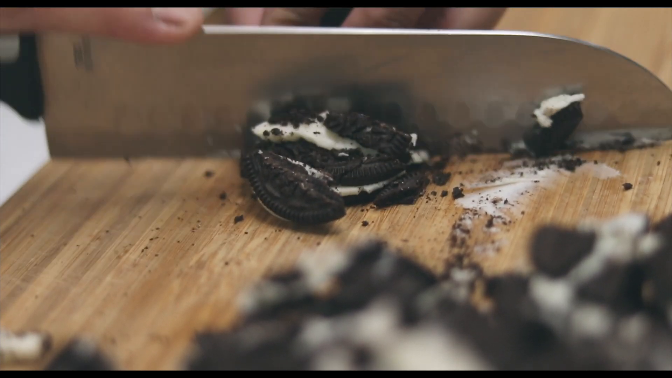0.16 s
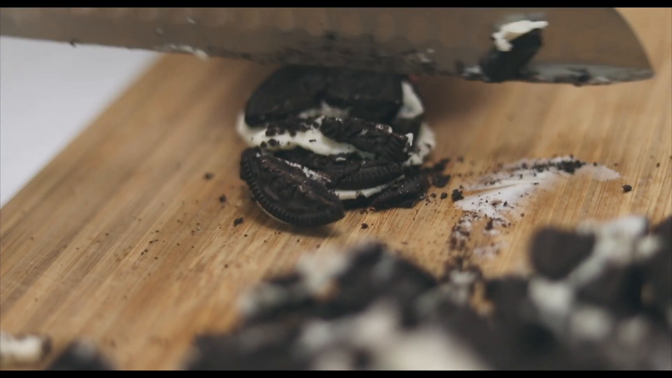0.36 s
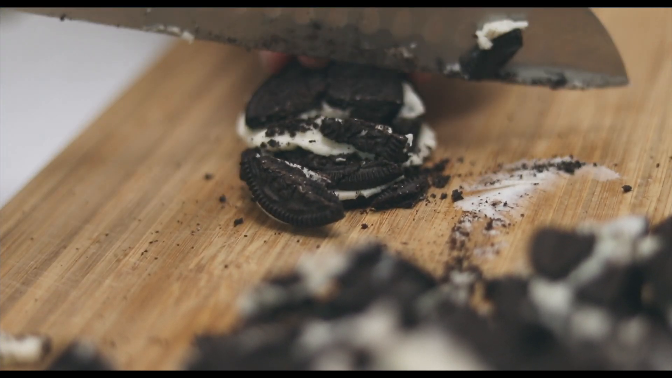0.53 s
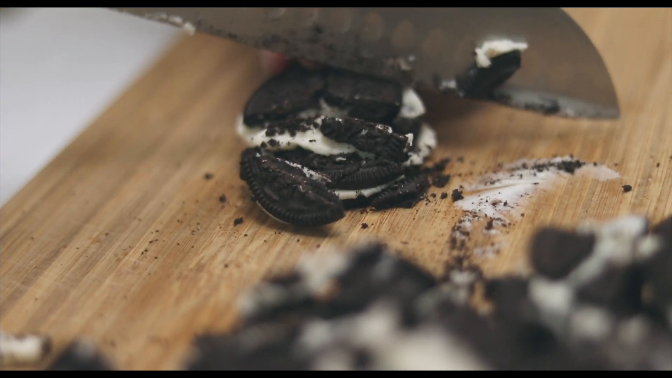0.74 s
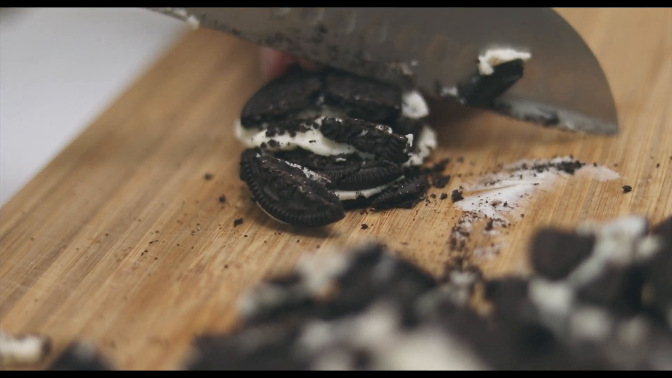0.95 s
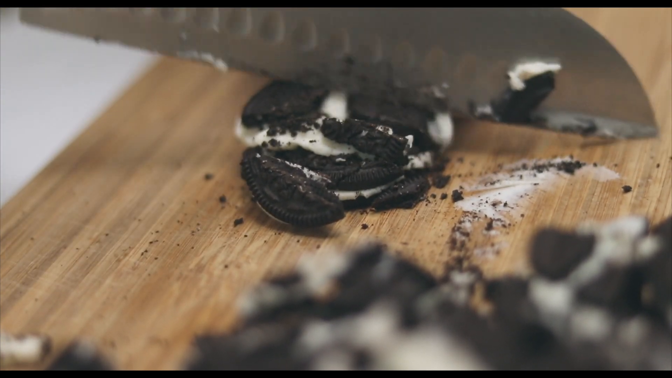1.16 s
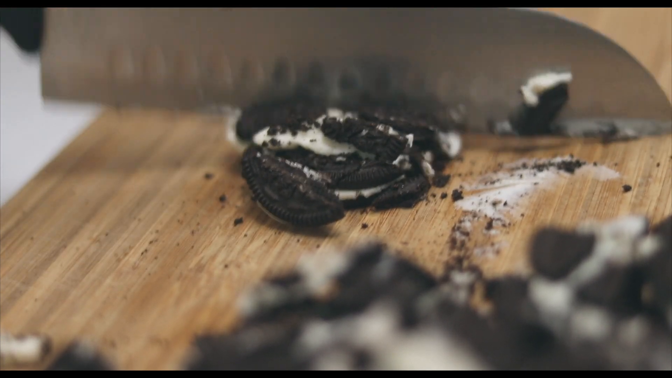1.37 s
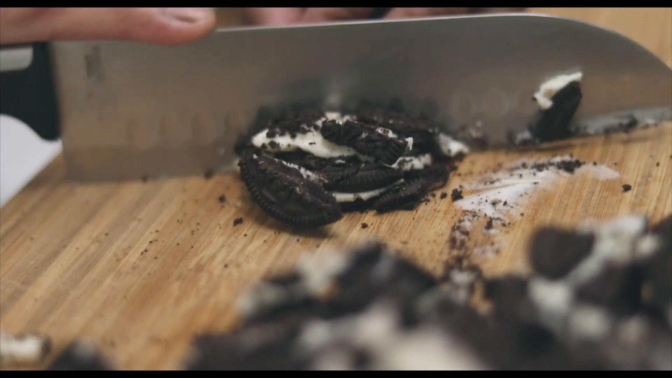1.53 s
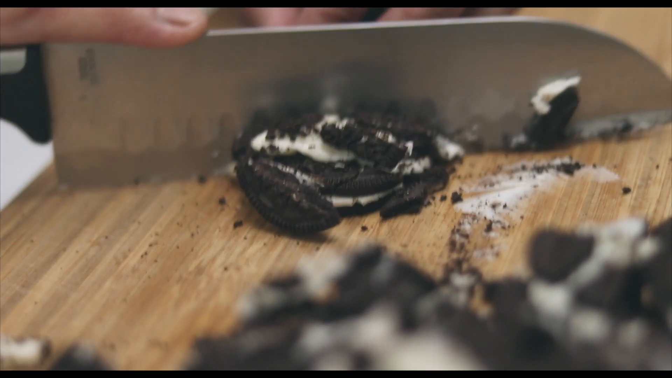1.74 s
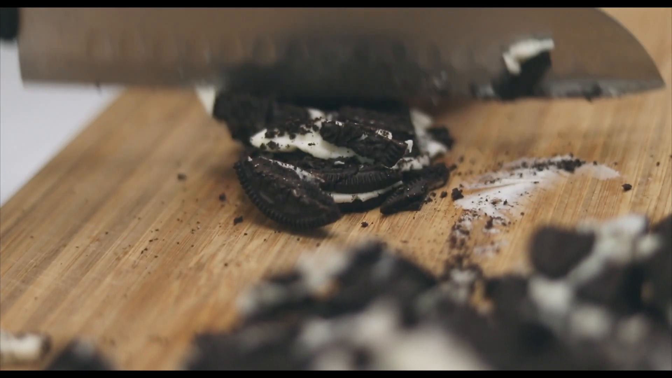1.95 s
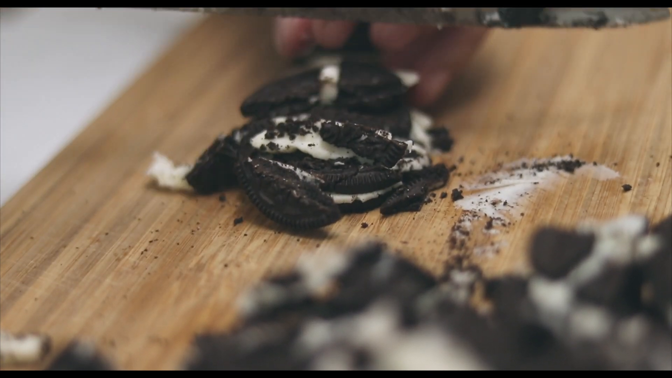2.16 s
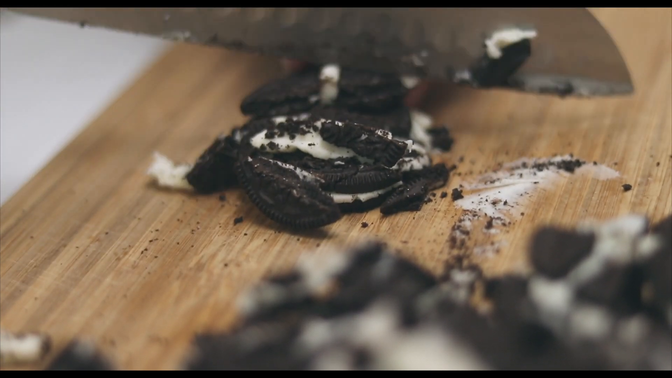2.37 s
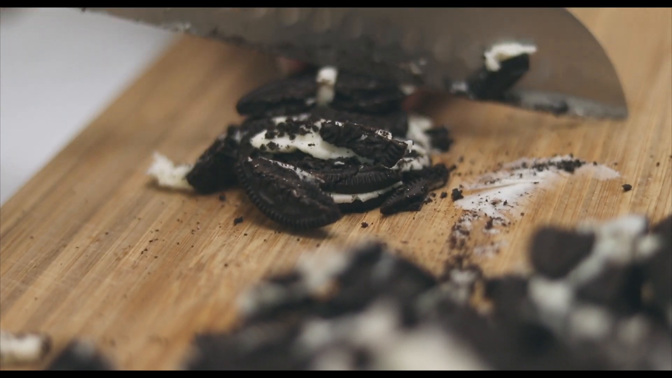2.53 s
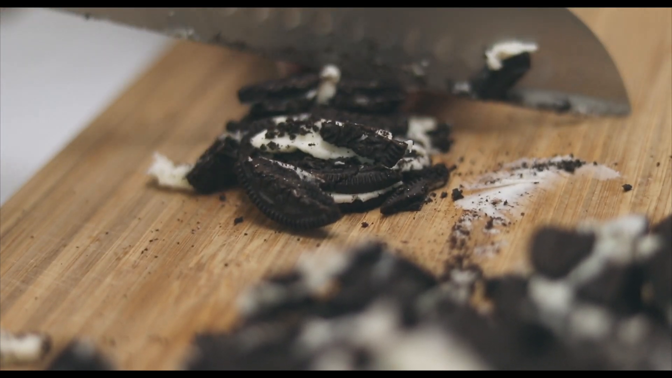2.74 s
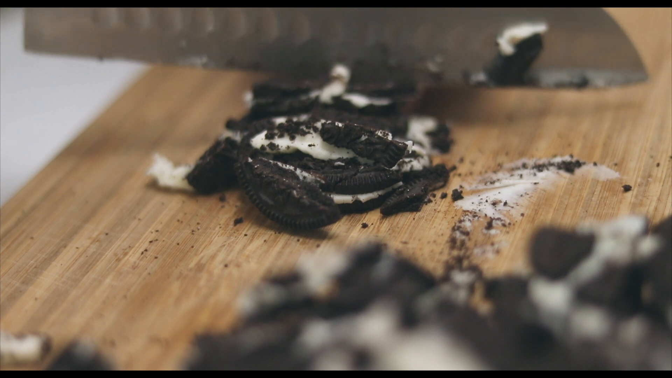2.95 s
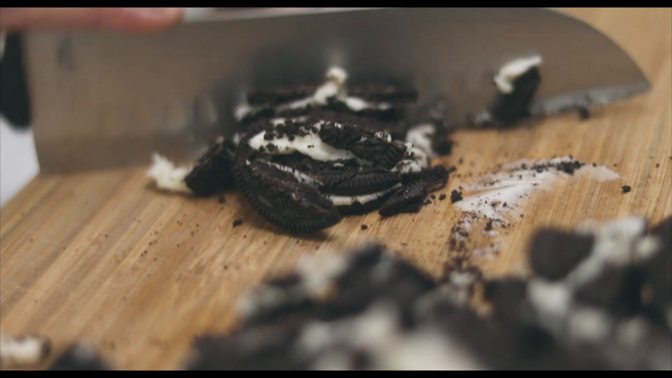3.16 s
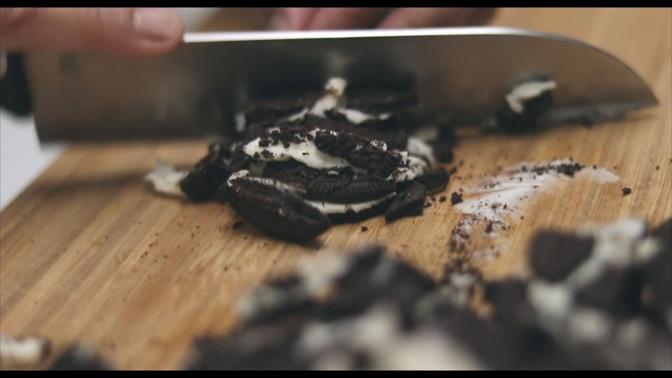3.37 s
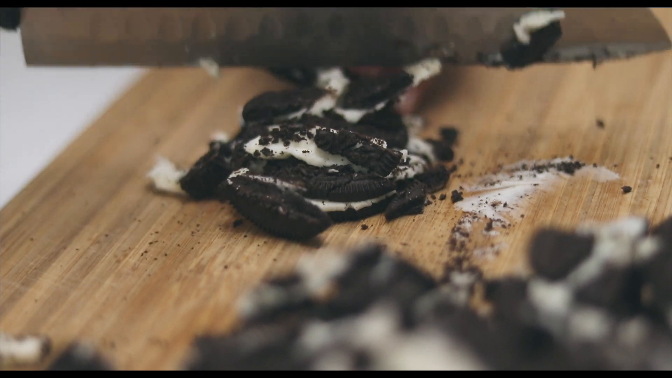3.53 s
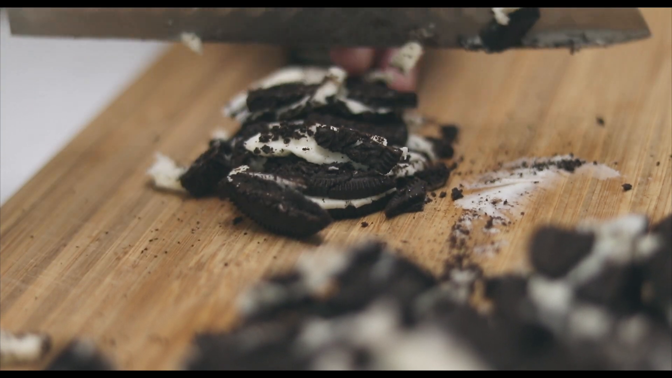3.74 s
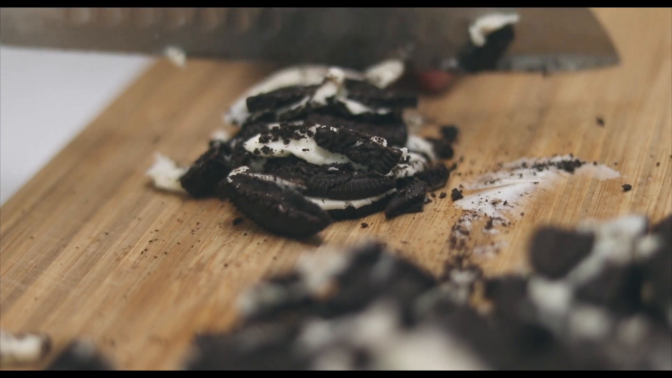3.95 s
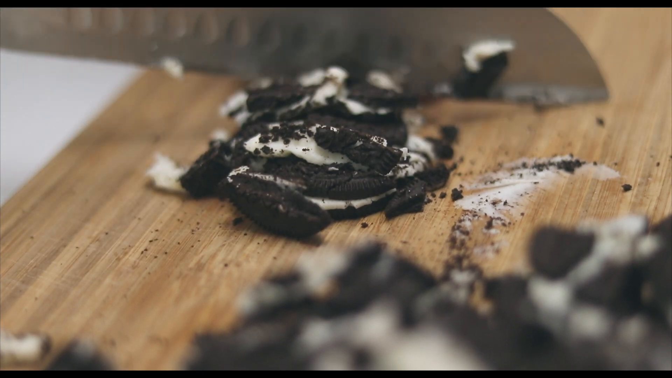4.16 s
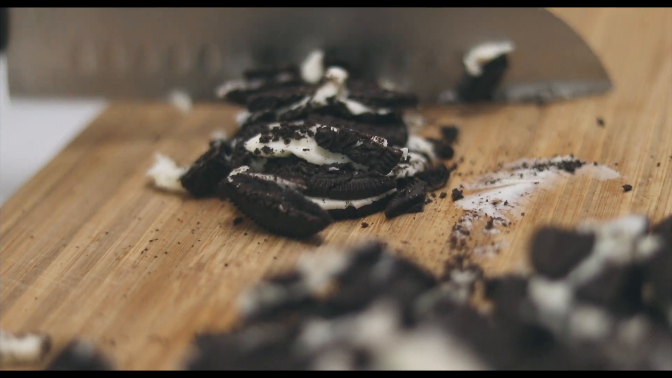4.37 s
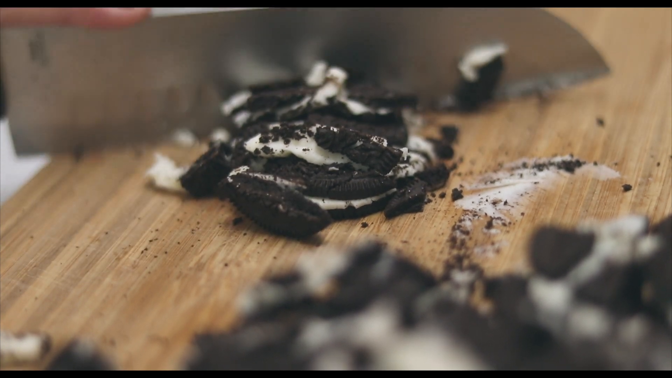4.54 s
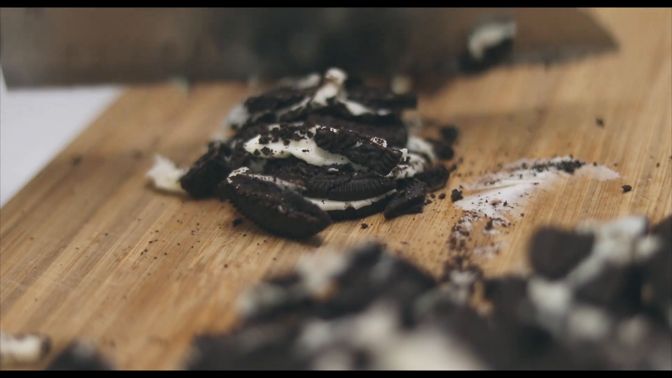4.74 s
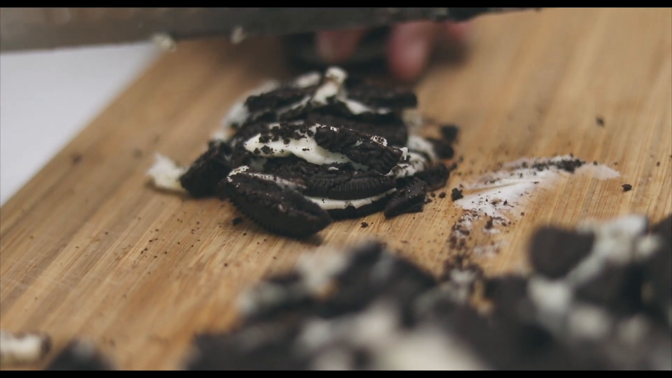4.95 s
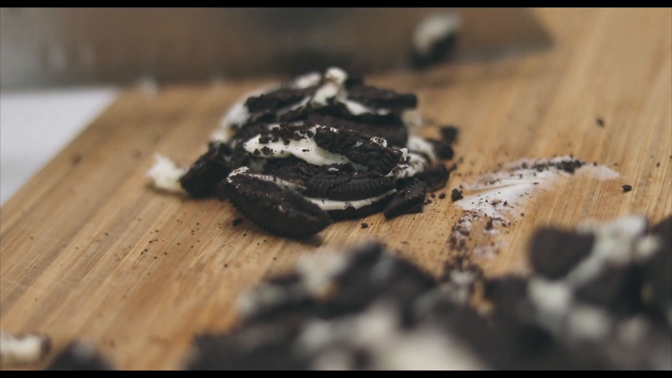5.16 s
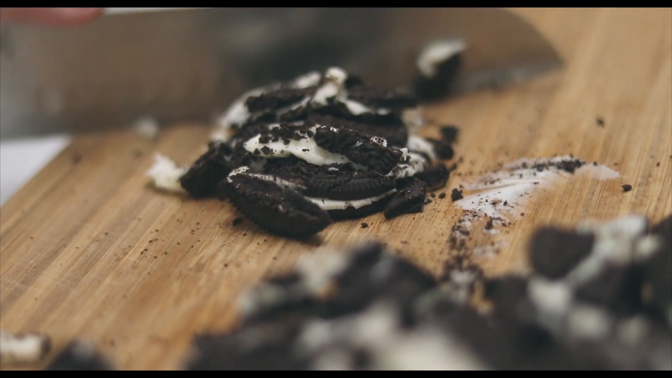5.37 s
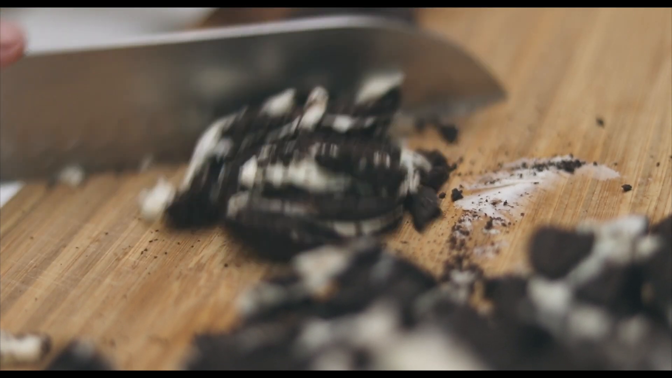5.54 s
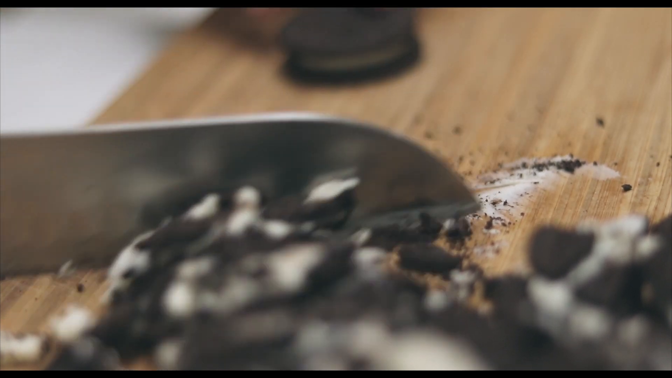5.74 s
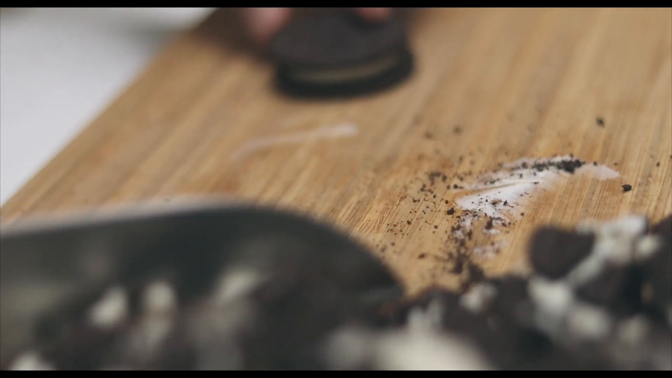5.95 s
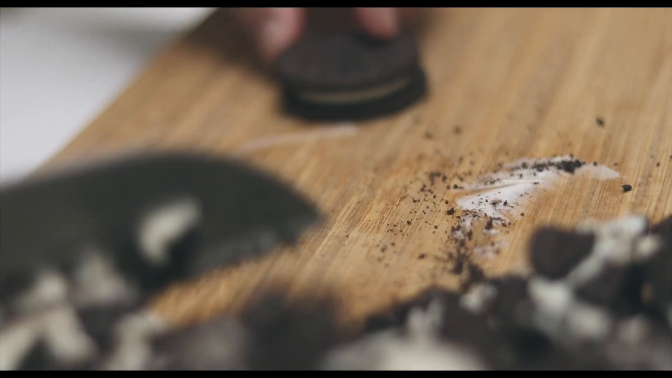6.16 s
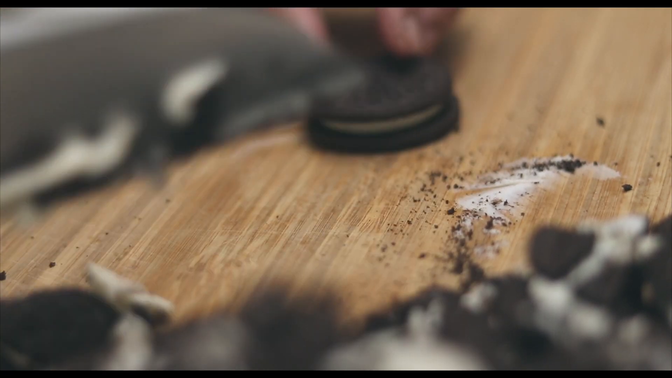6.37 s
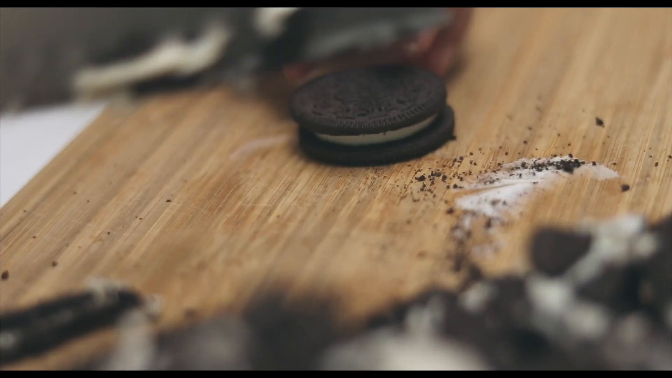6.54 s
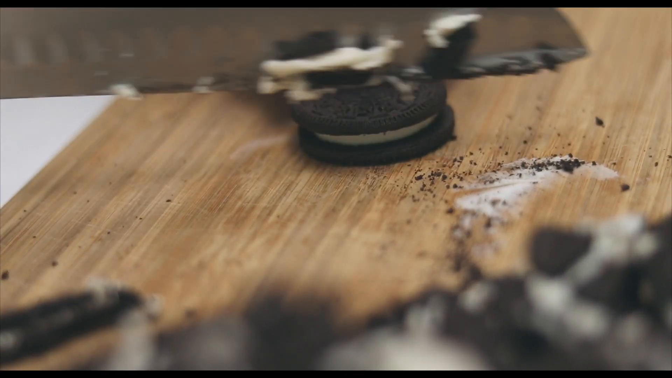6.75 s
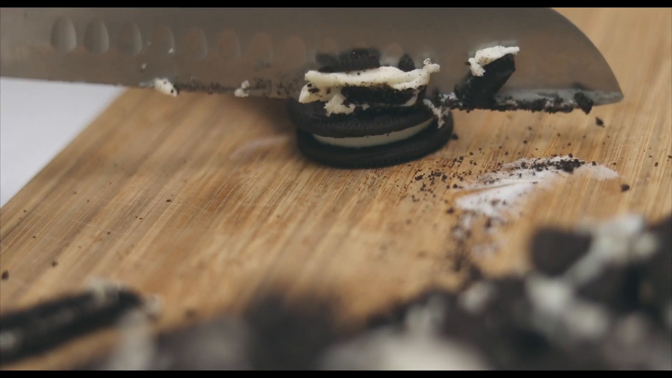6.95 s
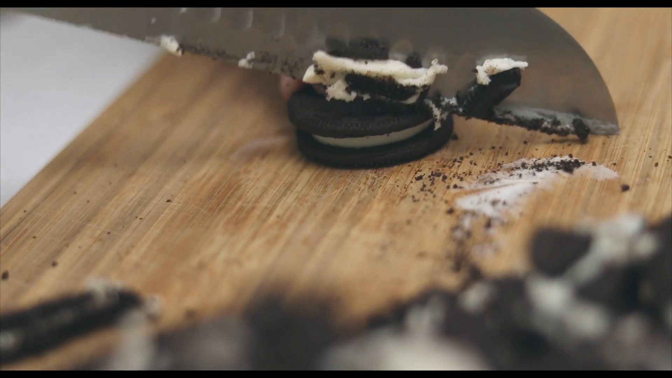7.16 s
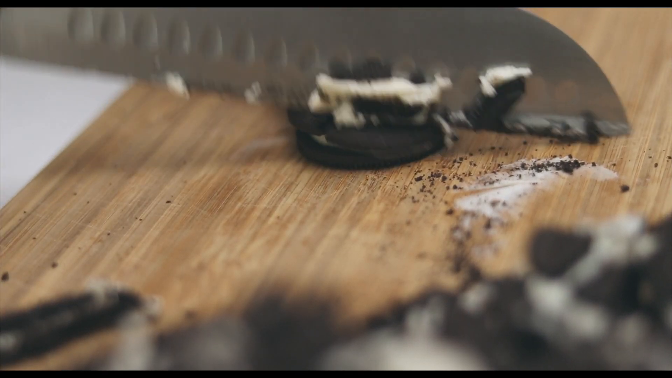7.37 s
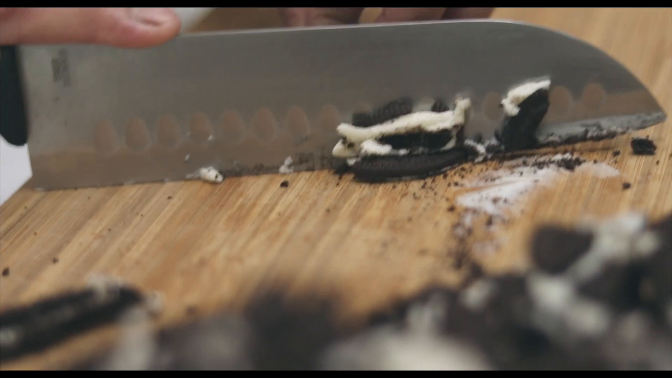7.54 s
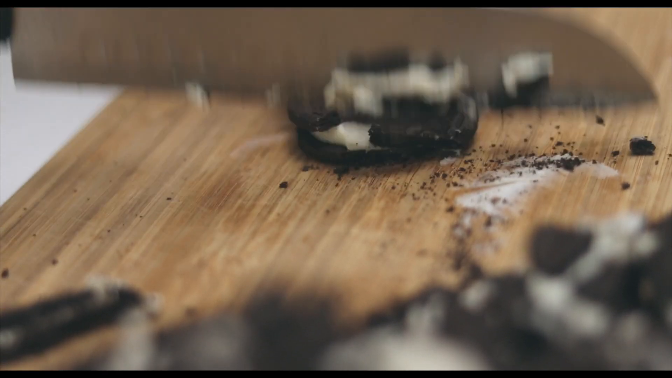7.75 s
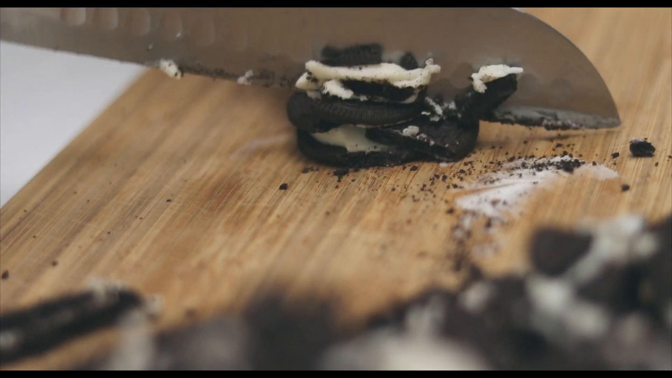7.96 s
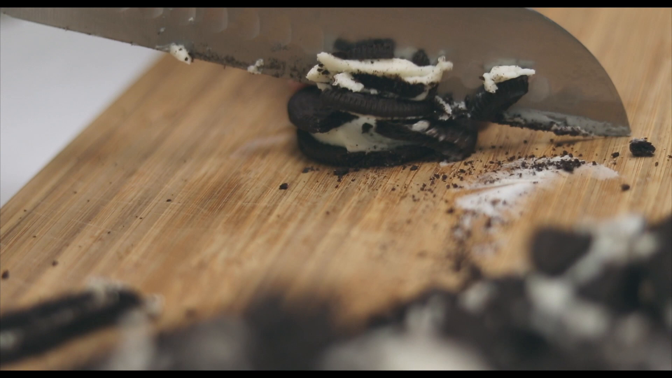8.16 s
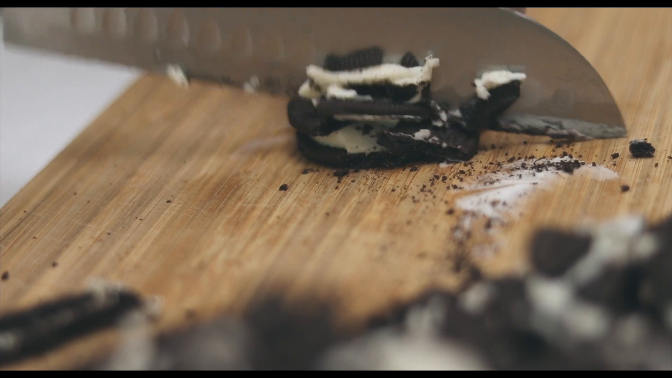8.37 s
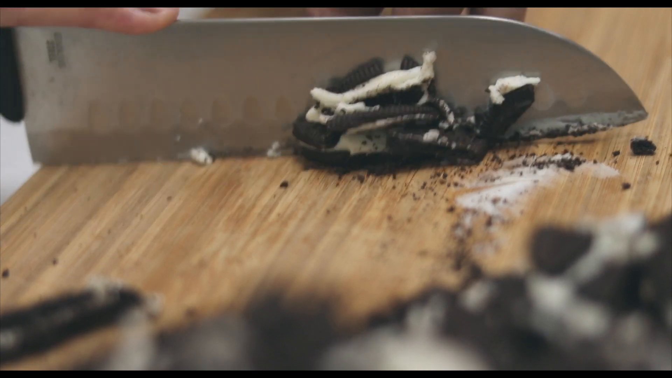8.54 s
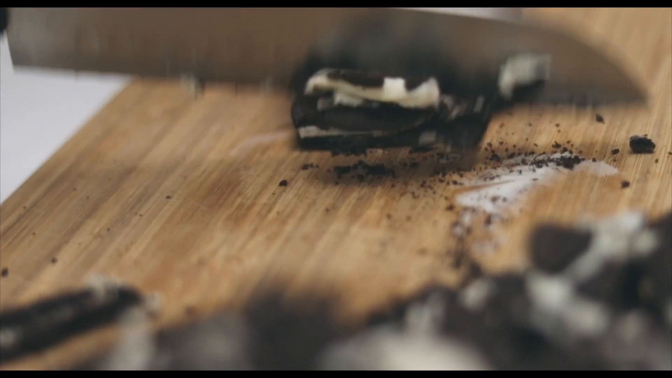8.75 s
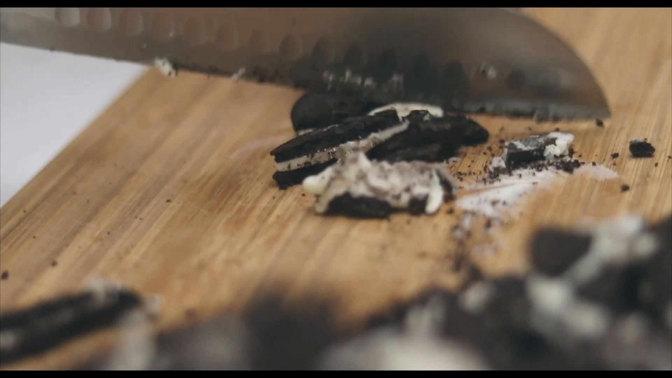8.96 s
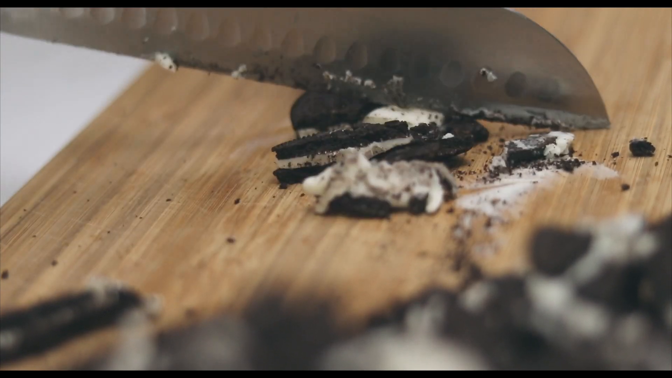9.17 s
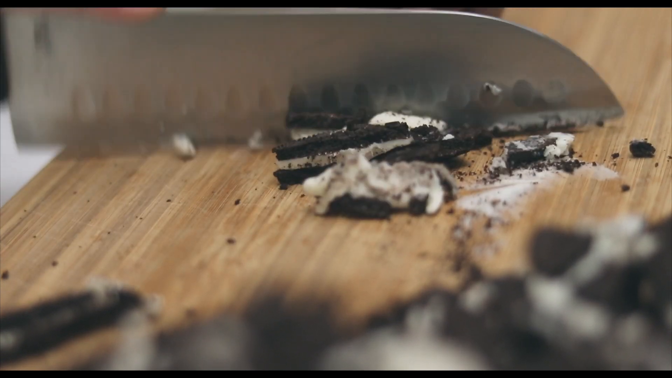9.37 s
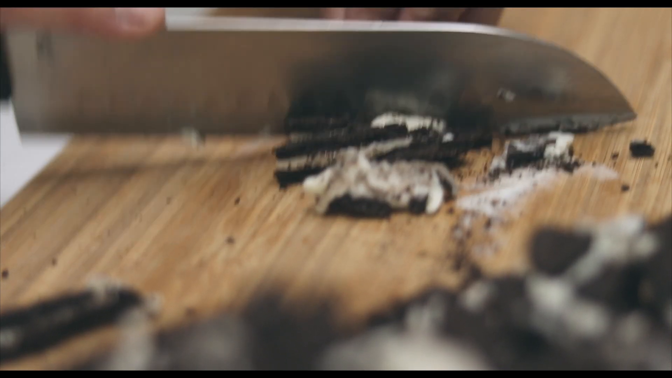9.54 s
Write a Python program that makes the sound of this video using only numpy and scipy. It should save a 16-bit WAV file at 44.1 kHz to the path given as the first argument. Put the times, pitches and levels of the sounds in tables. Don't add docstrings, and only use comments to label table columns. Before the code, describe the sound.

In a hard-walled kitchen with a very faint fridge hum, a close microphone catches a knife cutting crisp cookies on a wooden board. It opens mid-crunch with brittle cracks, then light taps and ticks. From about 1.2 s crackling thickens into a loud woody chop at 1.5 s. Quiet crumbs and dull knocks follow, then the hardest crunching chop at 3.1 s. A clean knock at 4.2 s precedes a quick double chop around 4.5 s. The edge lands at 5.3 s and drags until about 6.6 s, hissing, rasping and faintly singing, fading as pieces topple with tiny ticks. Near 7.5 s comes a crunchy thudding cut, a softer knock at 8.2 s, and a sharp crackling chop at 8.5 s. Pieces settle around 9 s, then a final, smaller crunch at 9.4 s. Blows ring briefly, echo off a wall, and the loudest overload slightly.

```python
import sys
import numpy as np
from scipy import signal
from scipy.fft import rfft, irfft, next_fast_len
from scipy.io import wavfile
from scipy.ndimage import uniform_filter1d

SR = 44100
rng = np.random.default_rng(int(sys.argv[2]) if len(sys.argv) > 2 else 0)


def generate_wav(signal):
    frames = np.transpose(np.atleast_2d(signal))
    scaled = np.clip(frames, -1, 1) * 32767
    pcm = np.round(scaled).astype(np.int16)
    wavfile.write(sys.argv[1], SR, pcm)


def volts(x):
    e = np.asarray(x, float) / 20
    return 10 ** e


N = 423801

# (pitch [Hz], width [Hz], level [dB])
FRIDGE_HUM = [(117, 27, -65.5), (325, 320, -69.5), (470, 18, -79)]
# (pitch [Hz], level [dB per Hz])
AIR_COLOUR = [(12, -52.5), (20, -15), (59, -17), (113, -0.5), (249, -7), (326, -12), (715, -15.5),
              (889, -11.5), (1260, -18), (1700, -14.5), (2420, -28), (2770, -18.5), (13000, -36.5)]
AIR_DB = -67.5

# (time [s], hold [s], level [dB])
PUSHES = [(0, 0.12, -41), (0.75, 0.0082, -62.5), (0.95, 0.012, -53.5), (1.293, 0.1, -46),
          (1.507, 0.078, -38.5), (2.008, 0.14, -81), (2.453, 0.056, -65.5), (2.66, 0.053, -57.5),
          (3.154, 0.055, -35), (4.22, 0.0069, -49), (4.477, 0.019, -37.5), (4.611, 0.084, -64),
          (5.297, 0.013, -49), (5.601, 1.26, -75.5), (7.208, 0.22, -56.5), (7.577, 0.073, -43.5),
          (8.529, 0.057, -42), (8.946, 0.26, -68), (9.466, 0.06, -39)]
PUSH_RISE_DB_PER_S, PUSH_FALL_DB_PER_S = 262, 119.5
# (pitch [Hz], level [dB])
RUMBLE_COLOUR = [(10, -36.5), (25, -5.0), (60, -4.0), (95, -4.0), (170, -12.5), (400, -64.0)]

# (pitch [Hz], level [dB], time to die by 60 dB [s])
DEEP_MODES = [(330, -5, .05), (440, -1, .045), (560, -7, .03)]
MAIN_MODES = [(720, -21, .018), (880, -2, .035), (940, -2, .03), (1075, -7, .022), (1170, -1, .01)]
MIDDLE_MODES = [(1430, -8, .022), (1550, -6, .022), (1700, -1, .03), (1880, -8, .014), (2125, -15, .025)]
UPPER_MODES = [(2335, -11, .025), (2715, -1, .03), (3100, -7, .03)]
# (pitch [Hz], level [dB], time to die by 60 dB [s])
CHOP_MAIN = [(883, 0, 0.037), (1000, -3.5, 0.032), (1188, -16.5, 0.044)]
CHOP_MIDDLE = [(1325, -10.5, .03), (1491, -4, 0.062), (1530, -5, .03), (1694, 1.5, 0.032),
               (1814, -11.5, .035)]
CHOP_UPPER = [(2190, -8, .025), (2684, -3, 0.047), (2772, -1.5, 0.06), (3110, -2, 0.025),
              (3490, -7.5, 0.02), (4220, -9.5, .012)]
# (pitch [Hz], level [dB], time to die by 60 dB [s])
LAND_MAIN = [(676, -19, 0.021), (970, -2.5, .028), (1080, -4.5, .02)]
LAND_MIDDLE = [(1360, -10.5, 0.031), (1709, -1.5, 0.035), (2103, -8, .04)]
# (pitch [Hz], width [Hz], level [dB])
SINGING_MODES = [(345.2, 74, -5.5), (445, 35, -10), (920.2, 48, 2.5), (1409, 270, -4), (1669, 65, 0.5),
                 (2702, 140, -4.5), (2786, 70, -7), (3140, 53, -14.5), (3880, 110, -12)]
SING_SHARE = 1.05

# (start [s], length [s], snaps at the end [dB], growth [dB], board ring [dB])
GRINDS = [(0, 0.075, -31, 0, -27.5), (1.031, 0.24, -54.5, 7.5, -52), (1.274, 0.095, -50, -1, -43),
          (1.402, 0.07, -30, 15, -24), (1.489, 0.058, -28.5, 5, -25.5), (2.636, 0.1, -68.5, -3.5, -65.5),
          (2.731, .2, -79, 0, -66), (3.086, 0.03, -41.5, 2, -38), (3.112, 0.014, -25.5, 9, -16),
          (2.289, 0.039, -76.5, 3.5, -64.5), (8.459, 0.036, -47, 6, -39), (1.379, 0.04, -55.5, -4, -56),
          (3.134, 0.12, -36, 3.5, -29), (4.177, 0.022, -54, 3, -44.5), (4.382, 0.078, -49, 15.5, -44),
          (4.48, 0.093, -52, -4.5, -41.5), (7.43, 0.058, -58.5, -11, -56), (7.498, 0.052, -40, 2.5, -38.5),
          (7.57, 0.019, -33.5, 0.5, -29.5), (8.433, 0.055, -38.5, 31, -36),
          (8.528, 0.044, -20.5, 19.5, -53), (8.984, 0.05, -71.5, -13.5, -67.5),
          (7.018, 0.082, -71.5, 1, -79), (3.043, .045, -64.5, 0.5, -59.5), (9.346, 0.077, -48, 2.5, -49),
          (9.393, 0.079, -28, 6, -29.5)]
GRIND_START_S, GRIND_FALL_DB_PER_S = 0.0014, 601
RING_FALL_DB_PER_S, RING_GROWTH = 452, 1
EASE_PER_DB = 0.08
# (start [s], length [s], level [dB])
RUSTLES = [(0, .09, -40.5), (0.229, 0.011, -51.5), (0.251, 0.0088, -54.5), (1.051, 0.075, -74),
           (1.13, 0.16, -69.5), (1.332, .09, -59), (8.442, 0.076, -61.5), (8.529, 0.056, -45.5),
           (1.295, 0.036, -54.5), (1.421, 0.056, -45.5), (1.495, .075, -42.5), (1.942, .065, -61),
           (2.048, .065, -64), (2.456, 0.013, -57), (2.73, .1, -79), (3.139, .04, -46.5),
           (3.197, 0.074, -49), (3.553, 0.0258, -66.5), (4.187, 0.024, -59.5), (4.8, 0.026, -69),
           (7.506, 0.1, -50)]
# (time [s], level [dB])
SPRAYS = [(1.484, -19.5), (1.954, -57.5), (2.46, -54.5), (2.632, -49.5), (3.128, -9.5), (4.218, -37),
          (4.471, -18), (4.525, -13), (5.287, -40.5), (7.424, -66), (8.525, -26.5), (9.146, -49.5)]
SPRAY_FALL_DB_PER_S = 1499
# (pitch [Hz], level [dB per Hz])
SNAP_COLOUR = [(1760, -22), (3000, -5), (3500, 0.5), (3960, 3), (5330, -0.5), (6740, -7), (10500, -9.5),
               (15700, -18.5)]

# (time [s], peak [dB], middle modes [dB], sharpness [dB])
CRACKS = [(0.017, -14, 4.5, -23), (0.041, -14, -9, -5.5), (0.064, -2.5, -2, -11.5),
          (1.207, -19.5, -10.5, -4), (1.272, -12.5, -5, -13.5), (1.329, -26.5, -3.5, -12.5),
          (1.407, -29.5, 5.5, -6.5), (1.427, -21.5, -0.5, -6), (1.442, -13.5, 4, -9.5),
          (1.455, -11.5, -0.5, -16.5), (1.468, -15.5, -3.5, -11), (1.509, -13, 0.5, 0.5),
          (1.518, -12.5, 2.5, -2), (1.545, -11.5, -4.5, 2), (3.117, -15.5, 0.5, -6.5), (3.195, -17, 4, 1.5),
          (3.216, -12.5, 2, -6.5), (3.258, -30, -11, 11.5), (7.502, -23.5, 3.5, -6.5),
          (7.512, -10.5, -4.5, -13.5), (7.523, -8, -8, -9.5), (7.578, -24.5, 10, 9.5),
          (8.485, -21, 7.5, -2.5), (8.572, -15, 8, 4.5), (8.975, -26.5, 0, 1.5), (9.378, -35.5, 15.5, -17),
          (9.408, -28.5, 17.5, -3), (9.428, -19.5, 6, -11), (9.449, -16, 7, -3), (9.47, -25.5, 5, 10)]
# (time [s], peak [dB], deep modes [dB], middle modes [dB], sharpness [dB])
THUDS = [(0.693, -30.5, -11, -12, -12), (0.921, -23.5, -3.5, -19.5, -27), (1.117, -27.5, -6, -4, -28.5),
         (1.138, -29.5, -12, -23, -23), (1.253, -26, -8, -18, -11), (1.528, -12, -27.5, -25, -13.5),
         (2.145, -44, -5, -19, -18), (2.472, -36, -6, -12, -8.5), (2.63, -23.5, -9, -8.5, -10.5),
         (2.658, -19, -15, -39, -44), (2.727, -39, -19.5, -2.5, -20), (3.09, -16.5, -24, -19, -16),
         (3.098, -9.5, -11, -8, -17), (6.943, -30, -5, -17, -9), (7.26, -35.5, -0.5, -29.5, -29),
         (7.425, -14, -10, -36.5, -12.5), (7.544, -2.5, -14.5, -31, -13), (7.626, -24, 2, -16, -36),
         (8.123, -37, 0, -20, -36), (9.167, -45, 8, -29, -33.5), (9.516, -24.5, 3.5, -14, -17)]
# (time [s], peak [dB], middle modes
# [dB], sharpness [dB])
CRUMBS = [(9.362, -39, 13, -3), (1.098, -45.5, 5.5, -6), (1.169, -40, -4.5, 1), (1.187, -41.5, -5, -6.5),
          (1.228, -35.5, -8, -4.5), (1.497, -29, -1.5, 6.5), (1.948, -41.5, -3, -2), (2.05, -55, -9, 5.5),
          (2.187, -38, -3.5, -5), (2.315, -47.5, 0, -22), (2.456, -53, 0, -3), (2.616, -34.5, -5, -13.5),
          (2.829, -55.5, -1.5, 2.5), (3.035, -32.5, -5.5, -3.5), (3.067, -38.5, -3, -4.5),
          (3.791, -33, 3.5, -18), (4.167, -41.5, -6.5, -21), (4.189, -40.5, 5, -11.5),
          (6.965, -31.5, -5, -15.5), (7.154, -30.5, -3.5, -11.5), (7.315, -34.5, -1, -10),
          (7.338, -42.5, 10, 4.5), (7.47, -36, 1, -7), (7.999, -47.5, 2, -1.5), (8.75, -34.5, 0, -0.5),
          (9.085, -28, -4.5, -15), (9.148, -33, 1, -11.5), (9.297, -48, -5.5, 8.5), (9.312, -46, 0.5, 2),
          (9.345, -45, 13.5, -4),
          (0.012, -34, -5.5, 1), (0.081, -44, -3, -1.5), (1.308, -34.5, 1, 5.5), (1.345, -43.5, -2, 5),
          (1.359, -38.5, -4.5, 4), (2.01, -62, -8.5, 6), (2.103, -56.5, -6.5, 7), (2.55, -54, 0.5, -6.5),
          (2.563, -59.5, -8.5, 2), (2.58, -52.5, 1, -8), (2.781, -62.5, -5.5, 2.5), (2.805, -63, -6, 4.5),
          (3.028, -41.5, -5.5, -3.5), (3.063, -51, -4, -1), (3.082, -40.5, -0.5, -1),
          (4.409, -47.5, -4.5, 7.5), (4.439, -28.5, -2, -9), (4.497, -34.5, 0, 2), (4.726, -56, -6.5, -1),
          (6.37, -44, 1.5, -13), (6.512, -59, -6.5, 1), (6.547, -59, -2.5, 1), (6.575, -49, -1, -8),
          (8.511, -20.5, 3.5, -4), (8.523, -2.5, 2.5, -21.5), (8.556, -25, 13, -0.5), (9.303, -54, -1, 6.5),
          (9.352, -41.5, -3, 2), (9.372, -49, 5, 8), (9.387, -40, 10, -10.5), (9.442, -21, -4, -11.5),
          (9.463, -22, 9.5, -3.5), (9.474, -22.5, 3, -10.5), (4.096, -54.5, 1, -4), (4.359, -59, -5, 6.5),
          (4.419, -51, -2, 4.5), (4.451, -45, -1.5, -0.5), (6.41, -57.5, -3.5, -2), (6.434, -45, -5, 1.5),
          (6.443, -47, -1, 0), (6.462, -59, -4, 3), (6.487, -59.5, -6, 3.5), (6.499, -56.5, -3, 2.5),
          (6.563, -52, 0, 1), (5.728, -26.5, -8, -12)]
# (time [s], peak [dB], deep modes [dB], middle modes [dB], upper modes [dB])
BLOWS = [
    (1.484, 5, -17, 0.5, -10.5),
    (3.129, 10, -18.5, 3.5, -14),
    (4.471, 6, -16, 4, -7.5),
    (4.526, 9, -11.5, 5, 3.5),
    (8.526, 3.5, -18, -0.5, -8.5),
]
# (time [s], peak [dB], middle modes [dB], sharpness [dB])
TOPPLES = [
    (2.246, -46, -5, 4.5),
    (6.361, -33, -12.5, -24.5),
    (6.422, -31.5, 0, 3),
    (6.433, -37, -8.5, -10),
    (6.476, -42.5, -3.5, -12),
    (6.556, -38.5, -13, -10),
    (9.004, -36, -14.5, -6),
    (9.028, -35.5, -6.5, 1),
    (9.061, -52, -5, 3.5),
    (8.988, -30, -6, 9),
]
# (time [s], peak [dB], deep modes [dB], middle modes [dB], upper modes [dB])
LANDINGS = [
    (4.219, 0.5, -19.5, -3, -19.5),
    (5.287, 1, -23.5, 3, -5),
    (8.226, -7, -17.5, -16, -29.5),
]
BLOW_TICK_DB, THUD_TICK_DB = -12.5, -0.5
CRACK_DEEP_DB, CRACK_TICK_DB = -7.5, -3.5
CRUMB_DEEP_DB, CRUMB_UPPER_DB, CRUMB_UPPER_SHARE = -10, -10.5, 0.18
TOPPLE_DEEP_DB, TOPPLE_TICK_DB = -15, -11
FIRM_LUCK, FIRM_CRACK, LOOSE_CRACK = 0.18, 0.33, .43
FIRM_RISE_S, LOOSE_RISE_S = 0.00038, 0.00088
# (pitch [Hz], level [dB per Hz])
TICK_COLOUR = [(2500, -23.5), (4000, -2.5), (5200, -6.5), (7500, -10.5), (9500, -12.5), (13000, -24.5),
               (17000, -35)]
TICK_T60_S, TICK_RISE_S = .007, .0006

# (delay [s], level [dB])
WALL_SLAPS = [(.0408, -9), (.0465, -19), (.055, -24)]
# (pitch [Hz], time to die by 60 dB [s])
ROOM_RING = [(100, 0.17), (400, .58), (1000, 0.87), (2000, 0.69), (4000, 0.67), (8000, 0.73), (15000, 0.18)]
# (pitch [Hz], level [dB])
WALL_COLOUR = [(100, 1.5), (450, 7), (700, -9), (950, -3.5), (1200, -3), (1450, 2), (1700, -2.5), (2150, 0),
               (2750, -2), (3500, 0), (4500, 1.5), (8000, -5), (15000, -10.5)]
SCATTER_HZ, SCATTER_S, SCATTER_SHARE = 189.5, .0021, 0.8
NEAR_SEND_DB = -4

# (time [s], pressure [dB])
DRAGS = [
    [(5.392, -28.5), (5.408, -5.5), (5.472, 1.5), (5.52, -9.5), (5.56, -20.5)],
    [(5.53, -20), (5.642, -10.5), (5.664, -3.5), (5.7, -1.5), (5.85, -9), (5.92, -3.5), (6.05, -11),
     (6.13, -14.5), (6.17, -50)],
    [(6.12, -4), (6.38, -1.5), (6.405, -8.5), (6.44, -3), (6.5, -8.5), (6.57, -8), (6.63, -34)],
]
# (edge hiss [dB], blade rasp [dB], board ring [dB])
DRAG_MIX = [(-43.5, -45, -33.5), (-43, -39, -33.5), (-75.5, -57.5, -44.5)]
DRAG_FOLLOW = (2.1, 1, 0.96)
# (pitch [Hz],
# width [Hz], level over the friction [dB], centre [s], half length [s])
DRAG_TONES = [(943, 80, -0.5, 5.71, 0.031), (1770, 57, 3.5, 5.92, 0.1312), (2746, 31, 4.5, 5.75, 0.068),
              (930, 83, -8.5, 6.11, 0.038), (2710, 41, -13, 6.08, 0.064), (1670, 82, -25.5, 6.28, 0.085),
              (2690, 46, -29, 6.25, 0.027), (936, 110, -17, 6.33, 0.077), (7600, 250, -12, 5.69, 0.087),
              (9200, 300, -14, 5.72, 0.079), (10100, 490, -12.5, 5.93, .08),
              (8700, 500, -9.5, 5.46, 0.038), (3860, 89, -10, 5.76, 0.086), (4760, 110, -8.5, 5.94, 0.044),
              (5820, 160, -10, 5.77, .06), (7350, 100, -18, 5.9, .09), (10500, 300, -13, 5.74, .08)]
# (pitch [Hz], level [dB per Hz])
EDGE_COLOUR = [(3820, -31), (6500, -13), (7000, 1.5), (7700, 7.5), (10800, -2.5), (11600, -11.5),
               (15700, -10)]
# (pitch [Hz], level [dB per Hz])
RASP_COLOUR = [(2500, 0), (3400, -5), (4500, -1), (6000, -5), (8000, -16.5), (12000, -17.5), (16000, -30)]
PATCH_DB, PATCH_FRAMES, PATCH_BINS = 3.0, 14, 7


def evened(x):
    return x / np.sqrt(np.mean(x ** 2) + 1e-20)


def coloured(x, points):
    size = next_fast_len(len(x))
    hz, db = np.transpose(points)
    log_hz = np.log(np.fft.rfftfreq(size, 1 / SR) + 1)
    gain = volts(np.interp(log_hz, np.log(hz), db))
    return irfft(rfft(x, size) * gain, size)[:len(x)]


def resonate(x, hz, width):
    return signal.lfilter(*signal.iirpeak(hz, hz / width, SR), x)


def resonate_twice(x, hz, width):
    return resonate(resonate(x, hz, width), hz, width)


def background():
    hum = sum(volts(db) * evened(resonate_twice(rng.standard_normal(N), hz, width))
              for hz, width, db in FRIDGE_HUM)
    air = coloured(rng.standard_normal(N), AIR_COLOUR + [(14200, -73.5)])
    return volts(AIR_DB) * evened(air) + hum


def push():
    t = np.arange(0, N / SR, .002)
    weight = np.zeros(len(t))
    for s, hold, db in PUSHES:
        rise = PUSH_RISE_DB_PER_S * np.maximum(s - t, 0)
        fall = PUSH_FALL_DB_PER_S * np.maximum(t - s - hold, 0)
        weight += volts(db - rise - fall)
    rumble = coloured(rng.standard_normal(N), RUMBLE_COLOUR)
    return np.interp(np.arange(N) / SR, t, weight) * evened(rumble)


def snaps(per_s):
    clump_db, size_db, grind = 2.5, 3, .7
    clumps = volts(clump_db * evened(uniform_filter1d(rng.standard_normal(N), 400)))
    sizes = volts(size_db * np.minimum(rng.exponential(1, N), 3.5))
    starts = sizes * (rng.random(N) < per_s / SR)
    lasting = signal.lfilter([1], [1, -np.exp(-1 / (0.0002 * SR))], starts)
    return rng.standard_normal(N) * (evened(lasting) + grind) * clumps


def stroke(start, length, end_db, growth_db, fall):
    out = np.zeros(N)
    t = np.arange(round((length + 60 / fall) * SR)) / SR
    ease_s = GRIND_START_S + EASE_PER_DB * max(growth_db, 0) * length
    growing_db = growth_db * (np.minimum(t / length, 1) - 1)
    falling_db = fall * np.maximum(t - length, 0)
    shape = np.minimum(t / ease_s, 1) * volts(end_db + np.minimum(growing_db - falling_db, 40))
    part = out[round(max(start, 0) * SR):][:len(t)]
    part += shape[:len(part)]
    return out


def board_ring(drive, damping, deep_db=5.5, upper_db=2, top_hz=5000):
    families = (MAIN_MODES + MIDDLE_MODES, 0), (UPPER_MODES, upper_db), (DEEP_MODES, deep_db)
    rung = sum(volts(db + lift_db) * resonate(drive, hz, damping / t60)
               for modes, lift_db in families for hz, db, t60 in modes)
    soften = signal.butter(1, top_hz, fs=SR, output="sos")
    return evened(signal.sosfilt(soften, rung))


def singing(drive):
    return evened(sum(volts(db) * evened(resonate_twice(drive, hz, width))
                      for hz, width, db in SINGING_MODES))


def crumble():
    large, fine = snaps(2100), snaps(1300)
    hiss = evened(resonate_twice(fine, 8800, 2600) + 0.055 * np.diff(fine, prepend=0))
    bright = evened(coloured(large, SNAP_COLOUR)) + 0.15 * hiss
    rustle = sum(stroke(s, length, db, 0, SPRAY_FALL_DB_PER_S) for s, length, db in RUSTLES)
    grind = sum(stroke(s, length, db, growth, GRIND_FALL_DB_PER_S)
                for s, length, db, growth, _ in GRINDS)
    spray = sum(stroke(s - GRIND_START_S, GRIND_START_S, db, 0, SPRAY_FALL_DB_PER_S) for s, db in SPRAYS)
    shake = sum(stroke(s, length, db, RING_GROWTH * growth, RING_FALL_DB_PER_S)
                for s, length, _, growth, db in GRINDS)
    board = 0.85 * board_ring(large, 2.2, upper_db=-1.0) + SING_SHARE * singing(large)
    return (grind + spray) * evened(bright) + rustle * hiss + shake * board


def ring(modes, luck, noise, t, crack):
    spread_db, detune, crack_t60 = 3.4, .008, 0.012
    wave = np.zeros(len(t))
    for (hz, db, t60), (level_luck, pitch_luck) in zip(modes, luck):
        fade = volts(db + spread_db * level_luck - 60 * t / t60)
        wave += fade * np.sin(2 * np.pi * hz * (1 + detune * pitch_luck) * t)
    limits = .97 * modes[0][0], 1.04 * modes[-1][0]
    band = signal.butter(3, limits, "band", fs=SR, output="sos")
    dry = signal.sosfilt(band, noise * volts(-60 * t / crack_t60))
    wave = wave / abs(wave).max() + crack * dry / abs(dry).max()
    return wave / abs(wave).max()


def hits():
    rows = [(s, db, deep, mid, up, up + BLOW_TICK_DB) for s, db, deep, mid, up in BLOWS + LANDINGS]
    rows += [(s, db, deep, mid, up, up + THUD_TICK_DB) for s, db, deep, mid, up in THUDS]
    rows += [(s, db, CRACK_DEEP_DB, mid, up, up + CRACK_TICK_DB) for s, db, mid, up in CRACKS]
    rows += [(s, db, CRUMB_DEEP_DB, mid, CRUMB_UPPER_DB + CRUMB_UPPER_SHARE * tick, tick)
             for s, db, mid, tick in CRUMBS]
    rows += [(s, db, TOPPLE_DEEP_DB, mid, up, up + TOPPLE_TICK_DB) for s, db, mid, up in TOPPLES]
    return rows


def knocks():
    size = 2500
    t, out = np.arange(size) / SR, np.zeros((2, N + size))
    firm_kinds = [(CHOP_MAIN, CHOP_MIDDLE, CHOP_UPPER)] * len(BLOWS)
    firm_kinds += [(LAND_MAIN, LAND_MIDDLE, UPPER_MODES)] * len(LANDINGS)
    for k, (s, peak_db, deep, middle, upper, tick_db) in enumerate(hits()):
        luck, noise = rng.standard_normal((4, 6, 2)), rng.standard_normal(size)
        if k < len(firm_kinds):
            low, mid, top = firm_kinds[k]
            chance, crack, rise = FIRM_LUCK, FIRM_CRACK, FIRM_RISE_S
        else:
            low, mid, top = MAIN_MODES, MIDDLE_MODES, UPPER_MODES
            chance, crack, rise = 1, LOOSE_CRACK, LOOSE_RISE_S
        main = max(0, middle - 9)
        families = zip((low, DEEP_MODES, mid, top), luck, (main, deep, middle, upper))
        body = sum(volts(db) * ring(modes, chance * spot, noise, t, crack) for modes, spot, db in families)
        body = body * (1 - np.exp(-t / rise))
        burst = noise * volts(-60 * t / TICK_T60_S) * (1 - np.exp(-t / TICK_RISE_S))
        tick = coloured(burst, TICK_COLOUR) * (t < .04)
        at = round((s + .0004) * SR)
        out[:, at:at + size] += volts(peak_db) * np.array([body, volts(tick_db) * tick / abs(tick).max()])
    return out[:, :N]


def scattered(x):
    wander = uniform_filter1d(rng.standard_normal(N), round(SCATTER_S * SR))
    phase = 2 * np.pi * np.cumsum(SCATTER_HZ * evened(wander)) / SR
    turned = (signal.hilbert(x, next_fast_len(N))[:N] * np.exp(1j * phase)).real
    return np.sqrt(1 - SCATTER_SHARE) * x + np.sqrt(SCATTER_SHARE) * turned


def kitchen(x, tail_db=-16, slap_db=1, slap_hz=1650):
    taps = np.zeros(SR // 10)
    for s, db in WALL_SLAPS:
        taps[round(s * SR)] = volts(db)
    slaps = resonate_twice(signal.oaconvolve(x, taps)[:N], slap_hz, 480)
    hz, t, z = signal.stft(rng.standard_normal(SR), SR, nperseg=256)
    ring_hz, ring_s = np.transpose(ROOM_RING)
    t60 = np.interp(np.log(hz + 1), np.log(ring_hz), ring_s)
    tail = signal.istft(z * volts(-60 * t / t60[:, None]), SR, nperseg=256)[1]
    tail *= np.clip(np.arange(len(tail)) / SR / 0.034, 0, 1) ** 1.1
    tail = coloured(tail / np.linalg.norm(tail), WALL_COLOUR)
    return volts(slap_db) * slaps + volts(tail_db) * signal.fftconvolve(scattered(x), tail)[:N]


def mottled(x):
    z = signal.stft(x, nperseg=512)[2]
    patches = uniform_filter1d(rng.standard_normal(z.shape[::-1]), PATCH_FRAMES, axis=0)
    patches = uniform_filter1d(patches, PATCH_BINS, axis=1)
    return signal.istft(z * volts(PATCH_DB * evened(patches).T), nperseg=512)[1][:N]


def played(rows, mix, layers):
    s, pressure_db = np.transpose(rows)
    span, out = slice(round(s[0] * SR), round(s[-1] * SR)), np.zeros(N)
    t = (np.arange(N) / SR)[span]
    fade = np.clip(np.minimum((t - s[0]) / .003, (s[-1] - t) / .04), 0, 1)
    pressure = np.interp(t, s, pressure_db)
    out[span] = fade * sum(volts(db + follow * pressure) * layer[span]
                           for db, follow, layer in zip(mix, DRAG_FOLLOW, layers))
    return out


def scrape():
    t = np.arange(N) / SR
    unevenness = evened(uniform_filter1d(rng.standard_normal(N), 90))
    grit = rng.standard_normal(N) * volts(1.8 * unevenness)
    lines = np.zeros(N)
    for hz, width, db, s, half in DRAG_TONES:
        swell = np.exp(-((t - s) / half) ** 2)
        lines += volts(db - 41.5) * swell * evened(resonate(grit, hz, width))
    rough = mottled(grit)
    hiss = evened(coloured(rough, EDGE_COLOUR))
    rasp = evened(coloured(rough, RASP_COLOUR))
    board = volts(-9.5) * board_ring(grit, 3.5) + volts(-13.5) * singing(grit)
    drag = sum(played(rows, mix, (hiss, rasp, board)) for rows, mix in zip(DRAGS, DRAG_MIX))
    return lines, drag


def scene():
    rung, ticks = knocks()
    lines, drag = scrape()
    cut = signal.butter(2, 260, "high", fs=SR, output="sos")
    board, near = signal.sosfilt(cut, [rung + crumble() + lines, ticks + drag])
    room = kitchen(board + volts(NEAR_SEND_DB) * near)
    return (board + near + room + push() + background())[None]


def low_pass(x):
    return signal.sosfilt(signal.butter(12, 15830, fs=SR, output="sos"), x)


def record(dry):
    mix = np.clip(dry, -1, 1)
    return low_pass(mix)


dry = scene()
out = record(dry)
generate_wav(out)
```